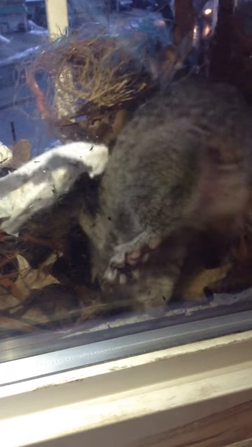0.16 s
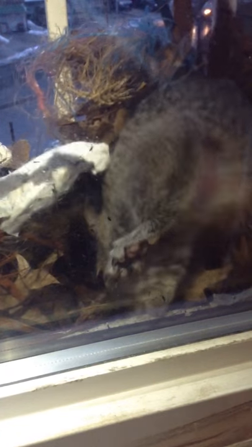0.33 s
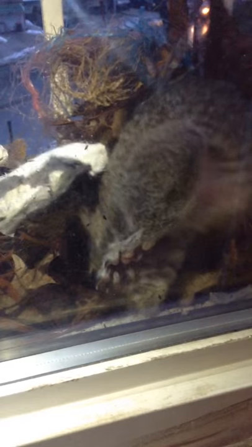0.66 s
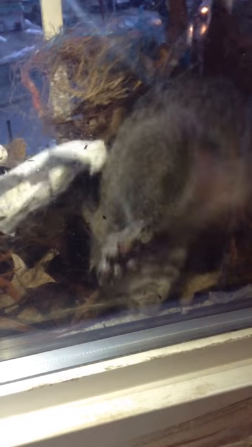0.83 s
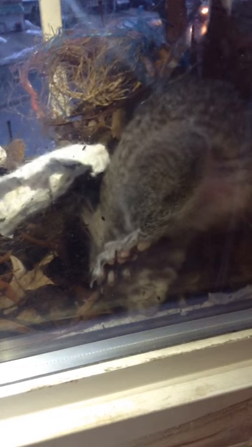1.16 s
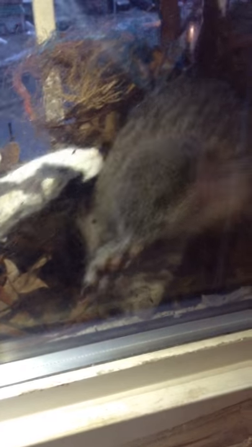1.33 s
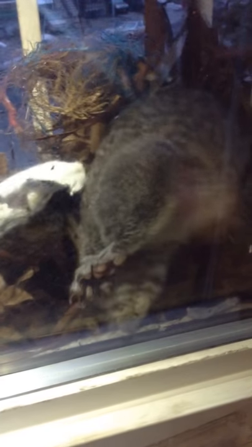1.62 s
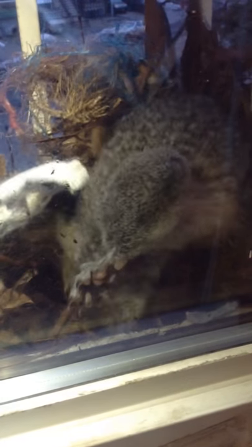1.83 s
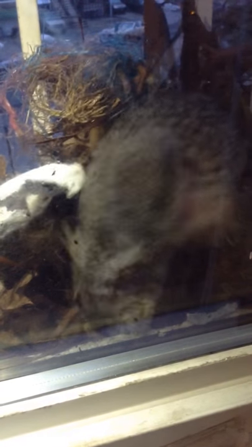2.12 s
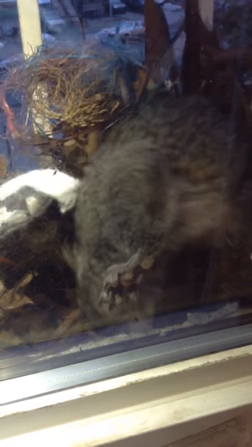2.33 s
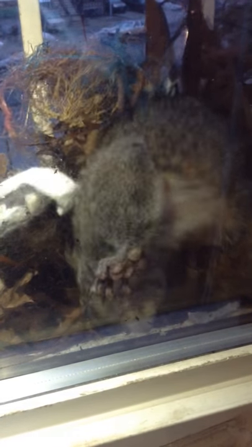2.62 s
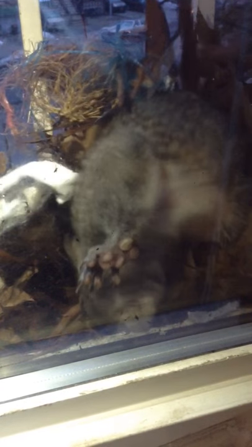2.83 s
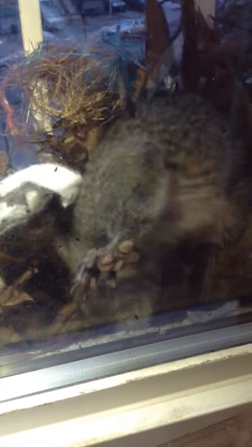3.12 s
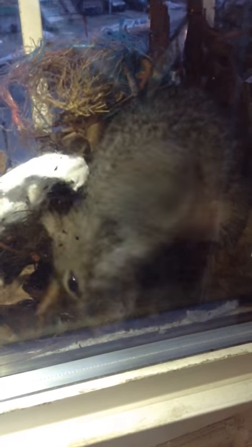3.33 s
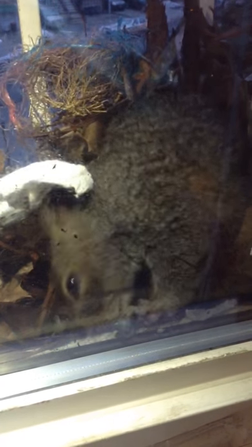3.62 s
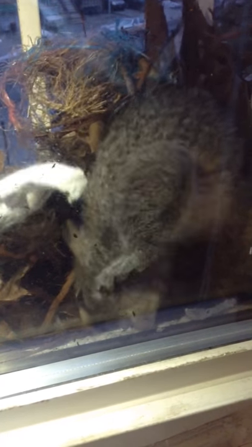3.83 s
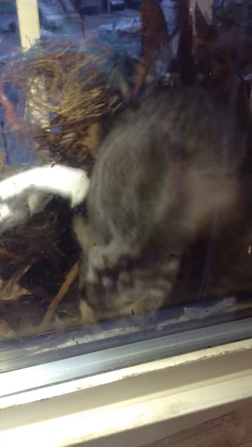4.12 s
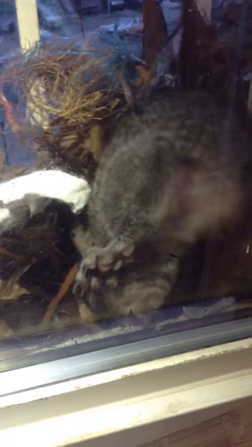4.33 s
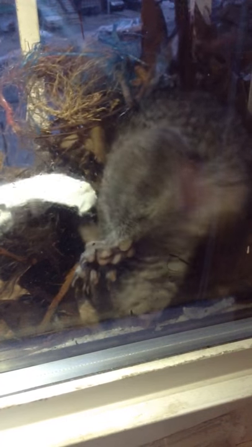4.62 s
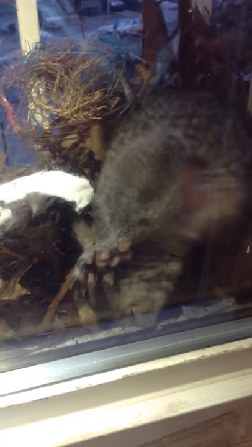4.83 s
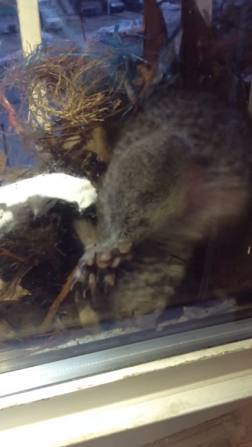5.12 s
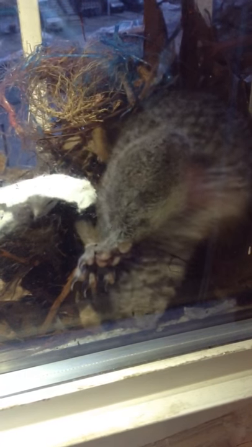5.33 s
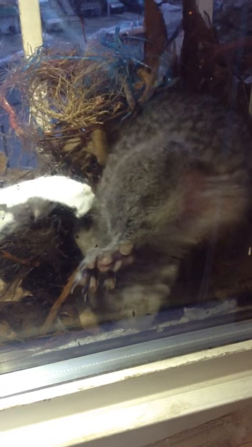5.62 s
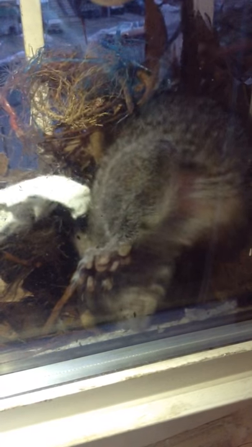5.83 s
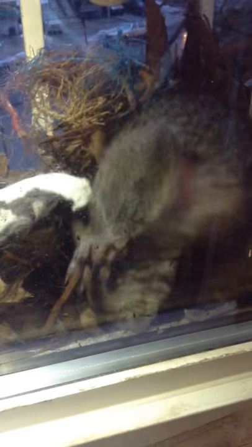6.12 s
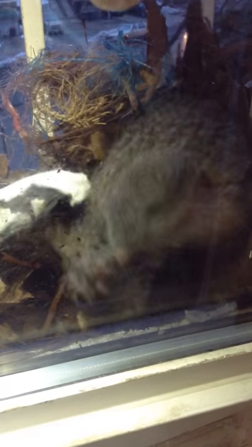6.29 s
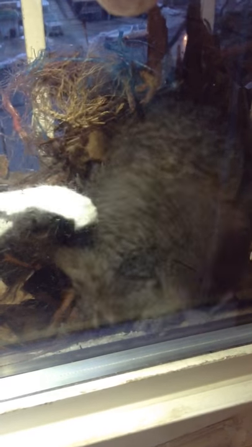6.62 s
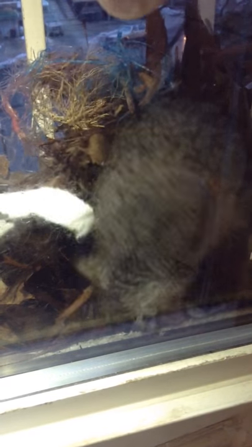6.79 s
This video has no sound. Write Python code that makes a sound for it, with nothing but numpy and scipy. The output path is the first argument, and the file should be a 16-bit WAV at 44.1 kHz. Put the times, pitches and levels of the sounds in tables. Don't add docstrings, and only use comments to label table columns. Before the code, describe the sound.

Close indoors at a window, a squirrel's claws work the glass from outside. From 0 to 0.5 s come a burst of body rustle, a firm knock at 0.13, then rapid clicks and soft paw thumps. Faint scrapes around 0.7 lead to two sharp raps at 0.9 and 1.0. Scattered knocks and skids continue, with a pair near 1.5 and a dragging cluster with a rustle swell at 1.8. Around 2 it quietens while the low hum rises; light ticks and muffled bumps patter from 2.3 to 3.2. A sparse lull follows until small ticks gather around 4.0-4.3. The loudest, brightest crack lands at 4.5, followed by spaced knocks at 5.2, 5.4 and 5.8 with dull frame bumps. Paw pats cluster near 6.1, then almost nothing but a tiny scrape at 6.7, a soft bump at 6.8, wavering hum and hiss. Every touch is short and dry, with a small curtained room's brief response.

```python
import sys
import numpy as np
from scipy import signal
from scipy.fft import rfft, irfft, next_fast_len
from scipy.io import wavfile
from scipy.ndimage import uniform_filter1d

SR = 44100
rng = np.random.default_rng(int(sys.argv[2]) if len(sys.argv) > 2 else 0)


def waveform_to_disk(signal):
    frames = np.transpose(np.atleast_2d(signal))
    scaled = np.clip(frames, -1, 1) * 32767
    samples = np.round(scaled).astype(np.int16)
    wavfile.write(sys.argv[1], SR, samples)


def attenuation_scalar(level_db):
    decades = np.asarray(level_db, float) / 20
    return 10 ** decades


N = 306495

# (time [s], claw force [dB], body weight behind it [dB], mid-pane ring [dB], tip sharpness [dB])
STRIKES = [(0.1287, -19.5, 3, -5, -12), (.3646, -31.5, 7, -5.5, -8), (.3909, -33, 8, -4, -16),
           (.4044, -42.5, 16.5, 7.5, 7), (.418, -38, 8, -2.5, -26), (.8854, -17, -12.5, -16, -4),
           (.9861, -19, -7, -19.5, -15), (1.2013, -30, 3.5, -4.5, -11), (1.4842, -20.5, -3, -7, -36),
           (1.4994, -32.5, 2.5, -6, -17), (1.6868, -28.5, 2, -7, -28), (2.459, -24.5, -1.5, -7, -22),
           (2.5943, -34.5, 1.5, -8.5, -10), (2.9198, -26.5, 1.5, -7, -2.5), (4.361, -28.5, 2.5, -10, -14),
           (4.5087, -8.5, -16, -4, 0), (4.5424, -36.5, -8, -2, -14), (4.559, -25.5, 0, -4.5, -12),
           (5.0038, -32.5, 7.5, -1, -4.5), (5.1798, -18.5, 0, -4.5, 5.5), (5.4035, -17.5, 6, -1.5, -5.5),
           (5.6282, -29.5, 2, -7, -3.5), (5.7702, -18, 2, -14.5, -20), (6.1505, -34, 13.5, -7.5, -14.5)]
# (time [s], force [dB], weight [dB], tip sharpness [dB])
TICKS = [(0.0709, -32, -9, -9.5), (.4693, -35, -8, -12), (0.4939, -30, -6.5, -7), (4.1857, -41.5, 4, -5),
         (2.3085, -45, -4, 3), (2.3224, -35.5, -1.5, 2), (2.4067, -43.5, 3, 3), (4.2002, -46.5, -5, -1.5),
         (2.7181, -36.5, 9.5, -6), (2.7281, -40, 9, -6), (2.74, -36, 3.5, -6), (2.866, -47, 11.5, -1),
         (2.894, -44.5, 14.5, -5), (3.06, -38.5, -16, -10), (3.1775, -36.5, -3.5, -11),
         (3.1908, -42, -5.5, 1.5), (3.886, -38.5, -10.5, -8.5), (3.927, -49, 5, -3),
         (3.943, -44.5, -13, -5), (4.0568, -31.5, -3, -9), (4.1636, -37, -2.5, -6.5),
         (4.1748, -39.5, 11, 0), (4.42, -50, 8, -8.5), (4.4538, -35, 2.5, -11), (4.6415, -43, 10, -4.5),
         (4.8435, -46, 1.5, -4.5), (5.0687, -42.5, 2.5, -0.5), (5.7133, -33.5, -6.5, -2.5),
         (5.8969, -47, 12.5, -1), (5.9714, -32.5, -5, -9)]
# (time [s], force [dB], weight [dB], skid length [ms])
GRAZES = [(.212, -35, 3.5, 1.06), (0.2561, -47, 11.5, 0.62), (0.2592, -38.5, 11, 0.75),
          (0.3525, -43, -4, 3.4), (0.6734, -49.5, 1.5, 2.6), (0.6955, -49, -1, 5.4), (0.743, -44.5, 0, 6.1),
          (0.7664, -40.5, 4.5, 3), (.7794, -43.5, -4, 4.5), (0.831, -42, -6, 2.2),
          (0.868, -32.5, -3.5, 3.9), (0.9726, -38.5, 3.5, 1.1), (1.1784, -42, 6, 1.5),
          (1.213, -39.5, 8, 0.67), (1.2664, -42, 1, 2.1), (1.442, -47.5, 2.5, 1), (1.4522, -46, -18, 0.79),
          (1.5493, -37.5, -10, 1.4), (1.5788, -40, 16.5, 1.67), (1.7614, -39.5, -3, 2.8),
          (1.791, -38.5, 0.5, 5.6), (1.7989, -34.5, -26, 4.2), (1.838, -39, -17, 3.1),
          (1.856, -40, -33, 2.8), (2.1355, -54.5, -2, 8.7), (2.1649, -50, -4, 1.8),
          (3.035, -49.5, 12.5, 2.7), (4.7822, -43.5, 5.5, 5.8), (5.2706, -40, 0, 0.85),
          (6.6953, -50, -20, 2.5)]
# (time [s], force [dB], weight [dB])
PADS = [(0.0178, -44.5, 8), (.0444, -70, 12), (0.0849, -42.5, 7.5), (0.3183, -50, -4), (0.4838, -52, 13),
        (1.11, -52, 17), (1.3219, -43.5, 16), (1.6635, -62, 27), (1.8, -38.5, 13), (1.9916, -54, 0),
        (2.4376, -44.5, 2), (2.4506, -53, 21), (2.492, -56, 12), (2.5694, -64, 29), (2.6113, -45.5, 15),
        (2.683, -61, 12), (2.824, -67, 25), (3.0073, -50.5, 9), (4.279, -65, 12.5), (4.293, -43, 2),
        (4.6544, -53, 23.5), (5.3106, -60, -5), (6.0135, -51, 17.5), (6.059, -51, -7),
        (6.1094, -57.5, 18.5), (6.121, -44, 12.5), (6.1418, -54.5, 22), (1.287, -47, 10), (2.175, -49, 2.5),
        (2.6713, -50, -8)]
# (time [s], level [dB])
BUMPS = [(0.035, -61), (0.09, -41), (0.167, -33), (0.321, -28), (0.42, -29), (0.599, -33), (0.789, -43),
         (1.374, -36), (2.069, -48), (2.414, -29), (2.551, -48), (2.778, -56), (3.629, -54), (4.654, -29),
         (4.907, -27.5), (5.603, -36), (6.002, -33), (6.072, -29.5), (6.827, -37), (0.52, -33.5),
         (1.123, -33), (1.292, -33), (4.049, -31), (4.265, -38), (4.299, -27), (4.449, -32)]
# (frequency [Hz], level [dB], t60 [s])
THUD = [(170.9, -2, 0.17), (217, 5, 0.05), (337, 2.5, 0.037), (393, -3, 0.046), (493.5, -11, 0.11),
        (556.6, 1, 0.054), (697.4, -15, 0.088)]
KNOCK = [(856, -11.5, 0.014), (928, -5, 0.045), (1052, -3, 0.064), (1181, -0.5, 0.036), (1323, 3, 0.021),
         (1510, 5.5, 0.015), (1755, -5.5, 0.043)]
SCRATCH = [(2088, 4, 0.0043), (2120, 2.5, 0.011), (2628, 6, 0.033), (2870, 1, 0.019), (3225, 7.5, 0.017),
           (3680, 10.5, 0.0095), (4045, 2, 0.035), (4530, 4.5, 0.018), (5163, 5, 0.021), (5600, 4, 0.011),
           (6750, -1, 0.023)]
TICK = [(8430, -2, 0.00072), (10310, -2.5, 0.0048), (11680, -2, 0.0045), (13000, -22, .003),
        (14400, -32.5, 0.0028)]
# (time [s], effort [dB])
EFFORT = [(0.0, 14), (.17, -11), (.35, 1), (.7, -6), (1.2, 0), (1.55, -4), (1.8, 10.5), (1.98, -11.5),
          (2.4, -4), (2.75, -1), (3.1, -3.5), (3.6, -8), (4.05, 1), (4.5, -1.5), (4.9, -5.5), (5.5, -10.5),
          (6.0, 1), (6.35, -8.5)]
# (frequency [Hz], level [dB per Hz])
RUSTLE_COLOUR = [(180, -50.5), (300, 2.5), (565, -0.5), (844, -8), (1520, -9.5), (2270, -15.5),
                 (2600, -17.5), (12000, -28), (15600, -50), (22000, -120)]
# (frequency [Hz], t60 [s])
ROOM = [(150, 0.78), (400, 0.23), (1000, 0.33), (2500, 0.26), (6000, 0.26), (12000, 0.15)]
# (time [s], level [dB])
HUM = [
    (0.0, 2),
    (.9, -1.5),
    (1.6, -1),
    (2.05, 8.5),
    (3.2, 3.5),
    (4.0, -4),
    (5.55, -7),
    (6.0, -3),
    (6.4, -5.5),
    (6.95, 6),
]
# (frequency [Hz], width [Hz])
HUM_NOTES = [
    (173, 53.4),
    (296, 38.7),
    (106.5, 60),
]
# (level [dB], share of effort [1], share of hum load [1])
HUM_MIX = [
    (-49.5, 0.73, 0.3),
    (-55, 0.01, 0.73),
    (-63, .9, 0),
]
# (frequency [Hz], level [dB per Hz])
HISS = [(15, -91), (25, -50.5), (126, -22), (156, -7.5), (178, 4), (198, -43.5), (246, -25.5), (297, -20),
        (389, -16), (445, -13), (509, -35.5), (703, -22), (2120, -30.5), (2360, -30), (15500, -33)]

STRIKE_MS, TICK_MS, PAD_MS = 1.676, 1.3, 1.01
RING_SHARE, TICK_RING_DB, GRAZE_RING_DB, PAD_RING_DB = 0.59, -10.5, -8, -10
GRAZE_TIP_DB, PAD_TIP_DB = -15, -11.5
FLEX_HZ, FLEX_T60_S, FLEX_DB, PUSH_MS, PUSH_DB = 168.9, 0.44, -23.5, 5.8, -21.5
GAP_DB = -6
ROOM_DB, BUILD_S = -18, 0.022
RUSTLE_DB, HISS_DB = -60.5, -59.5
WANDER_DB, WANDER_S = 1.5, 0.14


def claws():
    near, blows = np.zeros((2, N))
    for s, scratch_db, weight_db, ring_db, tip_db, ms in touches():
        thud_db, knock_db, tick_db = scratch_db + np.array([weight_db, ring_db, tip_db])
        force = skid(ms * np.clip(-scratch_db / 30, .4, 1.3), slips_per_s=7000)
        families = [
            (thud_db + 3.5, ring(THUD, force, detune=0.0051, wash_t60=0.072, size=3600)),
            (knock_db + 7.5, ring(KNOCK, force, detune=0.0064, wash_t60=0.097, size=2600)),
            (scratch_db - 1.0, ring(SCRATCH, force, detune=0.022, wash_t60=0.033, size=1800)),
            (tick_db + 4, ring(TICK, force, detune=0.005, wash_t60=0.0033, size=1500))]
        for db, (sound, blow) in families:
            add(near, s, attenuation_scalar(db) * sound)
            add(blows, s, attenuation_scalar(db) * blow)
    thin = signal.butter(2, 230, "high", fs=SR, output="sos")
    soft = signal.butter(1, 7000, fs=SR, output="sos")
    return signal.sosfilt(thin, near), signal.sosfilt(np.vstack([thin, soft]), blows)


def touches():
    strikes = [(*row, STRIKE_MS) for row in STRIKES]
    ticks = [(s, db, w, TICK_RING_DB + RING_SHARE * w, tip, TICK_MS) for s, db, w, tip in TICKS]
    grazes = [(s, db, w, GRAZE_RING_DB + RING_SHARE * w, GRAZE_TIP_DB, ms) for s, db, w, ms in GRAZES]
    pads = [(s, db, w, PAD_RING_DB + RING_SHARE * w, PAD_TIP_DB, PAD_MS) for s, db, w in PADS]
    return strikes + ticks + grazes + pads


def skid(ms, slips_per_s):
    t = np.arange(1500) / SR
    jerks = rng.standard_normal(1500) * (rng.random(1500) < slips_per_s / SR)
    jerks[0] = 0.3
    u = t / (np.clip(ms, .3, 12) / 1000)
    spectrum = rfft(jerks * (0.047 + u) * np.exp(-1.5 * u), 4096)
    flat = spectrum / uniform_filter1d(abs(spectrum), size=5)
    return irfft(flat)[:1500]


def ring(modes, contact, detune, wash_t60, size):
    hz, db, t60 = np.transpose(modes)[:, :, None]
    t = np.arange(size) / SR
    pitch_luck, place_luck, phase_luck = rng.standard_normal((3, len(hz), 1))
    wave = np.sin(2 * np.pi * hz * (1 + detune * pitch_luck) * t + .5 * phase_luck)
    place_db = 2.0 * place_luck
    fade = np.exp(-np.log(1000) * t / t60)
    modes_ringing = (attenuation_scalar(db + place_db) * fade * wave).sum(0)
    sound = signal.fftconvolve(modes_ringing, contact)[:size]
    sound /= abs(sound).max()
    blow = (attenuation_scalar(db) * fade ** 4 * wave).sum(0)
    scatter = rng.standard_normal(size) * np.tanh(t / 0.0033) * attenuation_scalar(-60 * t / wash_t60)
    wash = signal.fftconvolve(blow, scatter)[:size]
    level = np.sqrt(np.mean(sound ** 2))
    return sound + attenuation_scalar(GAP_DB) * level * evened(wash), level * evened(blow)


def flex():
    out, t = np.zeros(N), np.arange(SR // 4) / SR
    u = t * 1000 / PUSH_MS
    fade = attenuation_scalar(FLEX_DB - 60 * t / FLEX_T60_S)
    swing = fade * np.tanh(t / 0.0026) * np.sin(2 * np.pi * FLEX_HZ * t)
    push = attenuation_scalar(PUSH_DB) * u * (2 - u) * np.exp(-u)
    for s, db, weight_db, *_ in touches():
        add(out, s, attenuation_scalar(db + weight_db) * (swing + push))
    return out


def bumps():
    out = np.zeros(N)
    deep = signal.butter(2, 90, "high", fs=SR, output="sos")
    for s, db in BUMPS:
        thud, _ = ring(THUD, np.hanning(70), detune=0.0049, wash_t60=0.11, size=3600)
        add(out, s, attenuation_scalar(db) * signal.sosfilt(deep, thud))
    return out


def rustle():
    sizes = attenuation_scalar(1.2 * np.minimum(rng.exponential(1, N), 4))
    snaps = sizes * (rng.random(N) < 300 / SR)
    puffs = signal.oaconvolve(snaps, np.exp(-np.arange(900) / (0.014 * SR)))[:N]
    level = attenuation_scalar(RUSTLE_DB + along(EFFORT, 1) + wander())
    return level * coloured(puffs * rng.standard_normal(N), RUSTLE_COLOUR)


def echoes(x, decay, first, step):
    taps = np.zeros(SR // 2)
    at = np.arange(first, len(taps) - step, step)
    signs = rng.choice([-1., 1.], len(at))
    taps[at + rng.integers(0, step, len(at))] = signs * np.tanh(at / SR / BUILD_S) ** 2
    hz, t, bands = signal.stft(taps, SR, nperseg=128)
    fade = attenuation_scalar(-60 * t / read(decay, hz)[:, None])
    tail = signal.istft(bands * fade, SR, nperseg=128)[1]
    return signal.fftconvolve(x, tail / np.linalg.norm(tail))[:N]


def hum():
    out, t = np.zeros(N), np.arange(N) / SR
    drives = [np.ones(N), along(EFFORT, 1), along(HUM, 1)]
    for (hz, width), mix in zip(HUM_NOTES, HUM_MIX):
        r = np.exp(-np.pi * width / SR)
        noise = rng.standard_normal(N) + 1j * rng.standard_normal(N)
        waver = signal.lfilter([1], np.convolve([1, -r], [1, -r]), noise)
        note = evened((waver * np.exp(2j * np.pi * hz * t)).real)
        out += attenuation_scalar(np.dot(mix, drives) + wander()) * note
    return out


def hiss():
    return attenuation_scalar(HISS_DB) * coloured(rng.standard_normal(N), HISS)


def wander():
    smooth = max(round(WANDER_S * SR / 256), 1)
    steps = uniform_filter1d(rng.standard_normal(N // 256 + 2), size=smooth)
    return WANDER_DB * np.interp(np.arange(N) / 256, np.arange(len(steps)), evened(steps))


def coloured(x, spectrum):
    size = next_fast_len(N)
    gain = attenuation_scalar(read(spectrum, np.fft.rfftfreq(size, 1 / SR)))
    return evened(irfft(rfft(x, size) * gain, size)[:N])


def evened(x):
    return x / np.sqrt(np.mean(x ** 2) + 1e-20)


def read(points, hz):
    f, value = np.transpose(points)
    return np.interp(np.log(hz + 1), np.log(f + 1), value)


def along(rows, column):
    rows = np.array(rows)
    return np.interp(np.arange(N) / SR, rows[:, 0], rows[:, column])


def add(mix, s, sound):
    part = mix[round(s * SR):][:len(sound)]
    part += sound[:len(part)]


def scene():
    near, blows = claws()
    body = rustle()
    room = attenuation_scalar(ROOM_DB) * echoes(blows + body, ROOM, first=300, step=12)
    return (near + flex() + bumps() + body + room + hum() + hiss())[None]


def low_pass(x):
    return signal.sosfilt(signal.butter(12, 16180, fs=SR, output="sos"), x)


def record(dry):
    bass_cut = signal.butter(5, 125, "high", fs=SR, output="sos")
    mic = signal.sosfilt(bass_cut, dry) + attenuation_scalar(-13.0) * dry
    mic = np.tanh(mic ** 3 / 3 + mic)
    mix = signal.oaconvolve(mic, signal.firwin(127, 15300, fs=SR)[None], "same")
    return low_pass(mix)


dry = scene()
out = record(dry)
waveform_to_disk(out)
```